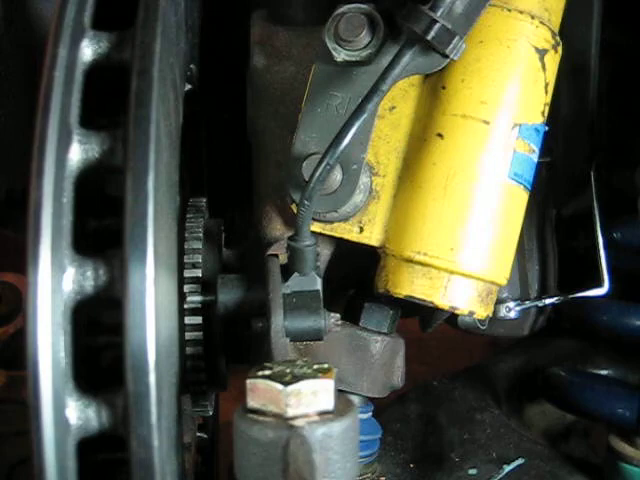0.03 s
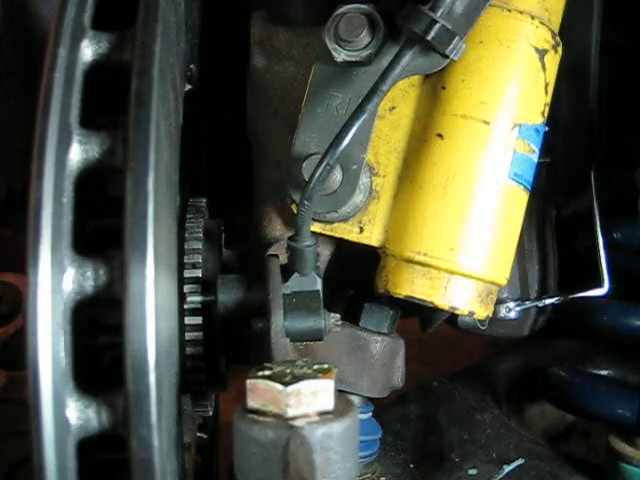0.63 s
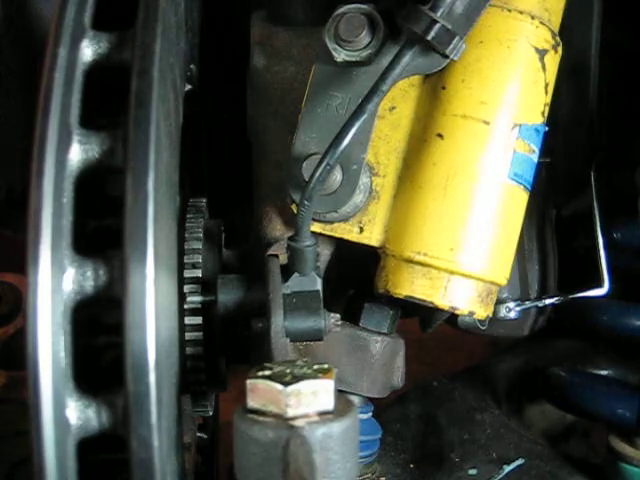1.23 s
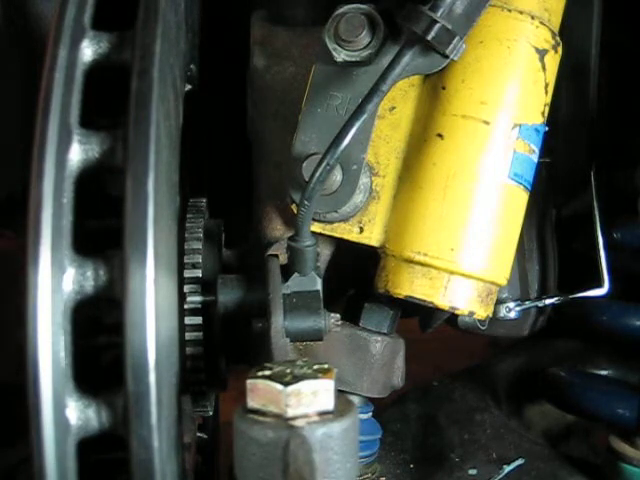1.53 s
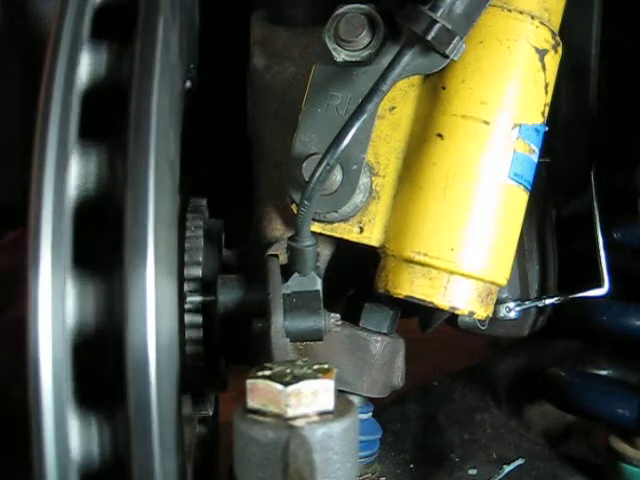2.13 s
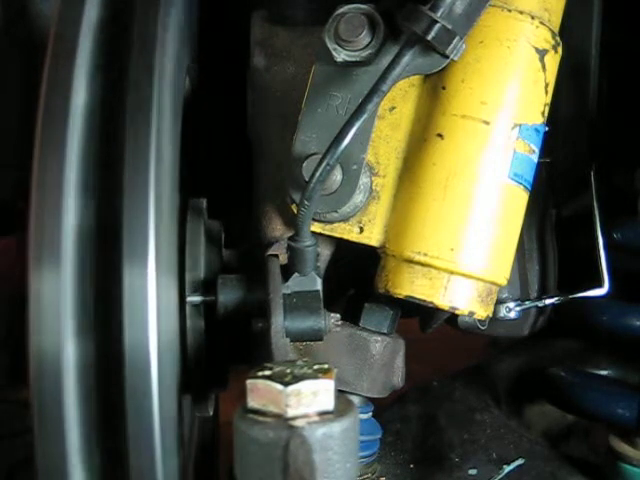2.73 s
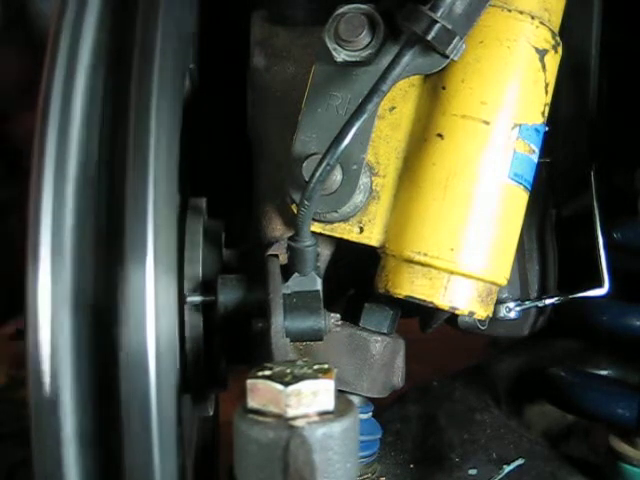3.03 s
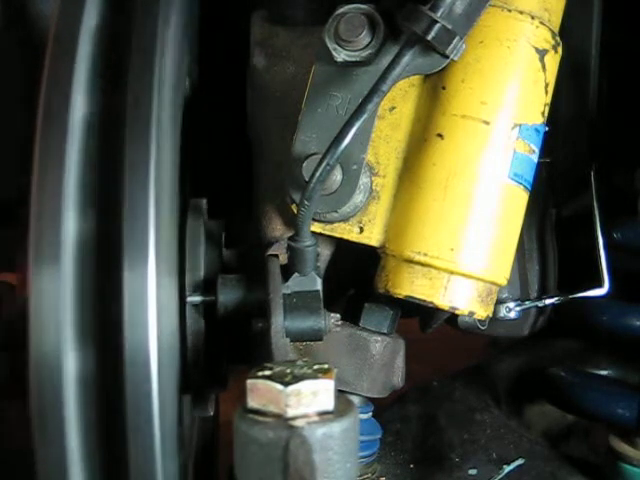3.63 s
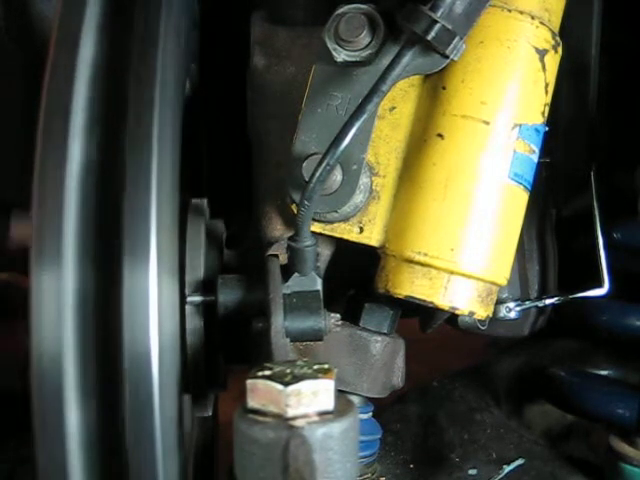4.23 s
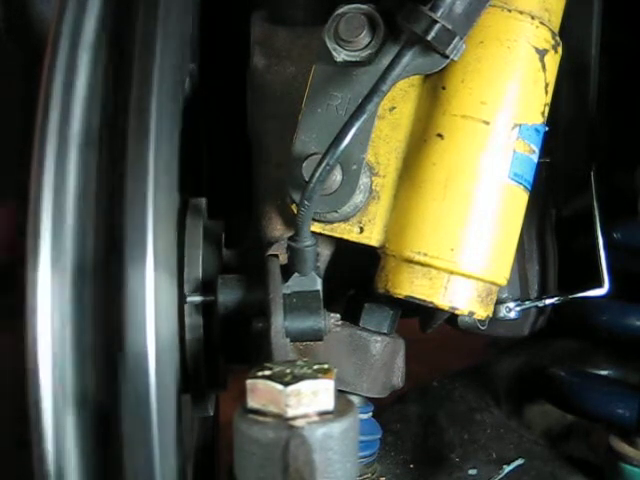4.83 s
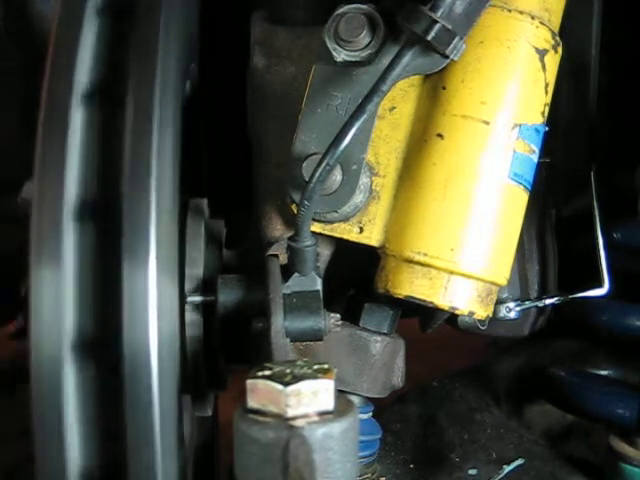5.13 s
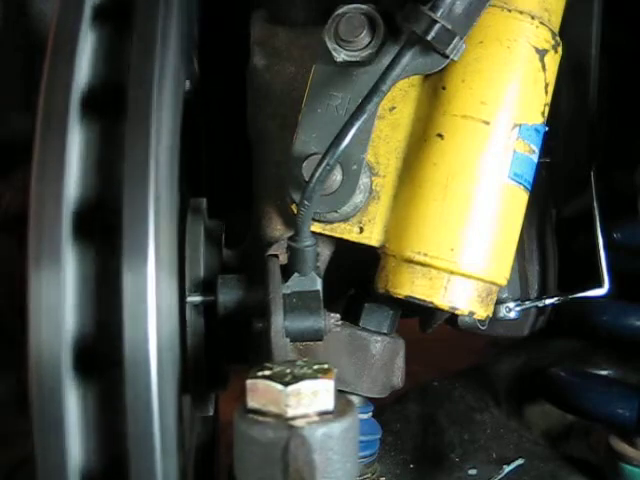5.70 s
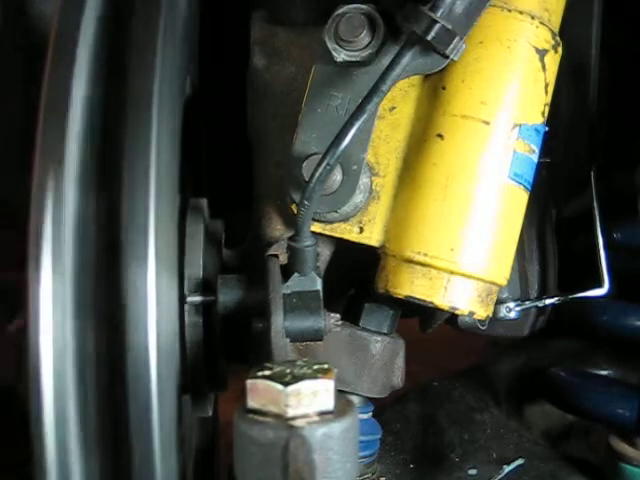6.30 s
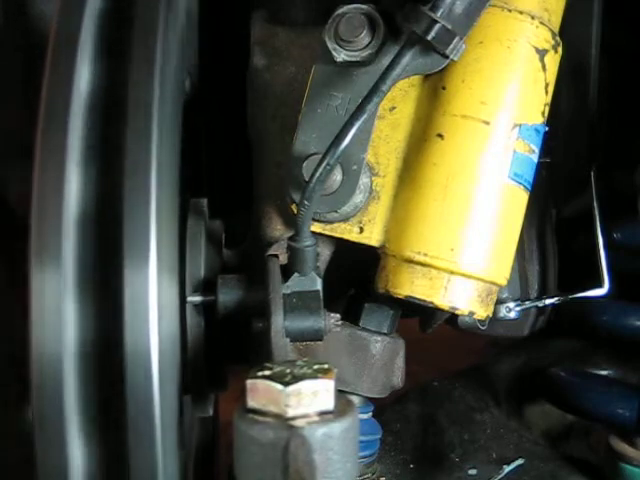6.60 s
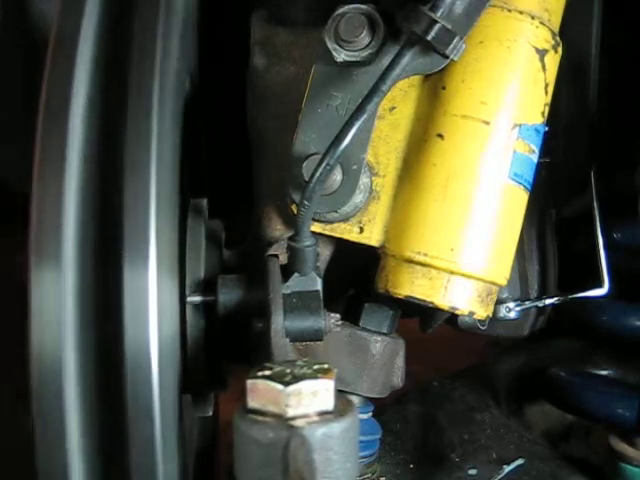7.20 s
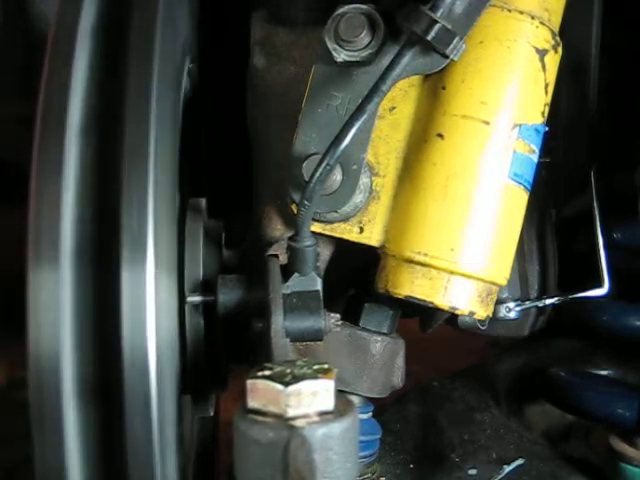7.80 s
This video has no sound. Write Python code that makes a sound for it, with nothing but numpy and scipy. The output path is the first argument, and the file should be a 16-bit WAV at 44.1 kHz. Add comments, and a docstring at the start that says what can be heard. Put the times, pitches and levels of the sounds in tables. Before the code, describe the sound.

After close scrapes and knocks, a spinning brake disc rubs with a metallic ring while its worn bearing growls and whirrs.

```python
"""A car's brake disc, spun by hand, rubs and rings: first in brief touches, at last steadily.
Its worn wheel bearing growls, whirrs and sings in patches as the balls roll over rough steel.
Before the spin, a hand scrapes over the metal and the loose hub clunks; a few more knocks follow.
It all happens close by in a garage, with a short echo, a soft hiss and a camera's thin whine."""
import sys
import numpy as np
from scipy import signal
from scipy.fft import rfft, irfft
from scipy.io import wavfile
from scipy.ndimage import uniform_filter1d

SR = 44100
rng = np.random.default_rng(int(sys.argv[2]) if len(sys.argv) > 2 else 0)


def digitize_waveform(pressure):
    """Quantize a signal to 16-bit integers and store it at the path in sys.argv[1].

    Rows of a 2-D input are taken as channels; values are limited to [-1, 1].
    """
    field = np.atleast_2d(pressure).T
    bounded = np.clip(field, -1, 1)
    quanta = np.round(bounded * 32767).astype(np.int16)
    wavfile.write(sys.argv[1], SR, quanta)


N = 350595
TIME = np.arange(N) / SR


def disc_rub():
    """The turning disc drags: tiny slips make the metal ring over a dry hiss."""
    # Brief touches. Each row: peak, rise and fall in seconds, ring in dB, hiss in dB, favoured pitch in Hz.
    rubs = [ (2.475, .014, 0.013, -34, -47, 3340), (2.513, 0.023, 0.039, -29.5, -39, 3620),
            (2.622, 0.011, .02, -35, -39.5, 3700), (2.665, 0.025, 0.043, -36, -49.5, 3580),
            (2.814, 0.02, .015, -45, -43.5, 3500), (2.91, 0.068, 0.019, -39, -58, 3460),
            (3.31, 0.096, 0.069, -36.5, -45, 3370), (3.74, 0.058, 0.015, -32, -70, 3470),
            (4.028, 0.042, 0.024, -47, -45.5, 3450), (4.16, 0.021, 0.015, -50, -50, 3420),
            (4.29, 0.07, 0.054, -36.5, -46.5, 3370), (4.366, 0.046, 0.03, -25.5, -41.5, 3440),
            (4.378, 0.0083, 0.0097, -18, -34, 3460), (4.46, 0.076, 0.059, -45, -47.5, 3430),
            (4.755, 0.15, 0.053, -49, -53, 3370), (4.87, 0.042, .03, -39, -52.5, 3470),
            (4.968, 0.015, 0.027, -44.5, -48, 3430), (5.05, 0.058, 0.12, -51, -55.5, 3360),
            (5.52, 0.032, .025, -50, -64, 3500), (5.665, 0.045, 0.013, -43.5, -55, 3500),
            (5.935, 0.055, 0.044, -39.5, -51.5, 3440), (6.07, .04, 0.038, -48, -48.5, 3480),
            (6.25, 0.047, 0.033, -36.5, -49, 3540), (6.46, 0.056, 0.072, -36, -51.5, 3560),
            (7.175, 0.056, .025, -43, -43, 3550), (7.505, 0.082, 0.034, -30.5, -51, 3420),
            (7.674, 0.036, 0.033, -30.5, -41.5, 3540), ]
    # The steady rub at the end, which dips twice. Each row: time in seconds, ring in dB.
    last_drag = [(6.5, -41), (6.63, -38.5), (6.88, -37), (7.11, -35), (7.19, -33), (7.23, -42.5),
                 (7.26, -39), (7.4, -35.5), (7.62, -44.5), (7.71, -32.5), (7.95, -36.5)]
    # The notes of the rubbed metal. Each row: pitch in Hz, width in Hz, level in dB.
    disc_notes = [(1540, 340, -3), (1834, 100, -5.5), (2416, 130, -4), (3035, 104, 4), (3214, 57, 2),
                  (3420, 270, -0.5), (3540, 170, 2), (3647, 71, 2), (4143, 64, 1), (4296, 75, -2),
                  (4670, 72, -18)]
    # The tone of the dry hiss. Each row: frequency in Hz, level in dB.
    dry_tone = [(150, -7.5), (500, -7), (1000, -7.5), (1700, 2), (2500, -0.5), (4800, 1.5), (6500, -3),
                (9000, -7), (13000, -13), (16000, -23)]
    *_, ring_db, hiss_db, ring_hz = np.transpose(rubs)
    touches, steady = swells(rubs, shape=1.6), level(last_drag)
    ring_gain = np.hypot(together(touches, ring_db), steady)
    hiss_gain = np.hypot(together(touches, hiss_db), amp(-12) * steady)
    touch_hz, steady_hz = leading(touches, ring_db, ring_hz), 3430
    contact_hz = touch_hz + (steady_hz - touch_hz) * (steady / ring_gain) ** 2
    slips = friction(per_s=9000, spread_db=2.0, judder_db=2.4, judder_per_s=170)
    grit = friction(per_s=12000, spread_db=3.0, judder_db=0.25, judder_per_s=35)
    # The contact moves as the disc turns, so each note's strength drifts, here at random.
    notes = unit(sum(amp(db + waver(per_s=12)) * ring(slips, [(hz, width, db)])
                     for hz, width, db in disc_notes))
    metal = unit(notes + amp(-5) * resonate(notes, contact_hz, width_hz=230))
    return amp(-1.5) * ring_gain * metal + amp(7.0) * hiss_gain * colour(grit, dry_tone)


def bearing():
    """Balls bump through pits in their track (growl, whirr); finer roughness makes the steel sing."""
    # Rough patches. Each row: peak, rise and fall in seconds, growl in dB, whirr in dB,
    # a factor on the whirr's pitch.
    rough_patches = [ (1.88, 0.17, 0.13, -43.5, -46, 0.93), (2.8, 0.11, 0.13, -52, -50.5, 0.96),
                     (3.53, 0.17, .14, -50, -44, 1.02), (3.8, 0.22, .2, -52, -51, 1.03),
                     (4.17, 0.071, 0.21, -50.5, -47.5, 0.89), (4.45, 0.084, 0.077, -43.5, -42, .94),
                     (4.645, 0.065, 0.052, -50, -40.5, 0.95), (5.085, 0.096, 0.12, -44.5, -39, .97),
                     (6, 0.21, 0.21, -52, -57, 0.59), ]
    # Spells of thin singing. Each row: peak, rise and fall in seconds, level in dB.
    singing_spells = [(2.82, 0.2, 0.21, -46.5), (3.6, 0.27, 0.53, -46), (6.02, 0.43, 0.36, -51.5),
                      (6.44, 0.05, 0.046, -44.5)]
    # The notes of the growl, whirr and steel tracks. Each row: pitch in Hz, width in Hz, level in dB.
    growl_notes = [(345.5, 60, 5), (402.6, 42, 0)]
    whirr_notes = [(1287, 60, -8), (1350, 190, -1)]
    track_notes = [(1880, 240, -1), (2600, 60, 8), (4400, 200, -4), (4850, 99, -1), (5090, 120, 8),
                   (5680, 140, -7), (8540, 290, -0.5), (10050, 160, -4), (12340, 260, 0), (12830, 280, 0),
                   (13600, 260, 3)]
    # The sizzle between the tracks' notes. Each row: frequency in Hz, level in dB.
    sizzle_tone = [(3000, -3.5), (6000, -2), (9000, -8.5), (11200, -5), (12800, -4), (14200, -17),
                   (16000, -22)]
    *_, growl_db, whirr_db, pitch_factor = np.transpose(rough_patches)
    patches = swells(rough_patches, shape=2.9)
    bumps = friction(per_s=1800, spread_db=2.0, judder_db=0.0, judder_per_s=89)
    growl = together(patches, growl_db) * ring(bumps, growl_notes)
    shift = leading(patches, whirr_db, pitch_factor)
    whirr = unit(sum(amp(db) * resonate(bumps, hz * shift, width) for hz, width, db in whirr_notes))
    whirr *= together(patches, whirr_db)
    roughness = friction(per_s=8000, spread_db=2.5, judder_db=0.7, judder_per_s=82)
    sing_gain = together(swells(singing_spells, shape=4), db=np.array(singing_spells)[:, -1])
    singing = sing_gain * (ring(roughness, track_notes) + amp(5.5) * colour(roughness, sizzle_tone))
    return amp(-4.5) * growl + amp(-4) * whirr + amp(-4) * singing


def hub_clunks():
    """The loose hub knocks: each sharp blow and brief rattle clicks and sets it ringing."""
    # Each row: start in seconds, thud in dB, click in dB, rattle time in seconds, bass cutoff in Hz.
    knocks = [ (0.895, -34, -35.5, 0.033, 1200), (0.912, -24, -38, 0.0033, 280),
              (0.919, -23.5, -53, .005, 280), (0.955, -24, -35, 0.0032, 230),
              (0.995, -31, -38, 0.0045, 250), (1.072, -35, -47, 0.003, 252), (1.22, -18, -43, .005, 650),
              (1.2875, -17, -37, 0.019, 220), (1.3, -22, -40, 0.011, 280), (1.543, -27, -48, 0.016, 78.5),
              (1.563, -28, -29.5, 0.024, 90), (1.594, -22.5, -29, 0.011, 89),
              (1.6087, -16, -17, 0.00083, 70), (1.62, -22, -11.5, 0.002, 100),
              (1.641, -29, -48, 0.0061, 60), (1.649, -21, -33, 0.0013, 60), (1.669, -25, -22.5, 0.0038, 80),
              (1.804, -30, -35.5, 0.01, 1000), (1.952, -27.5, -37, .013, 149),
              (2.083, -21, -29.5, 0.002, 192), (2.113, -24, -60, 0.0025, 170),
              (2.616, -46, -50, 0.0031, 100), (3.421, -17, -40.5, 0.0066, 1500),
              (4.375, -44, -35, 0.0044, 400), ]
    # The notes of the hub and strut. Each row: pitch in Hz, level in dB, seconds to fade by 60 dB.
    hub_notes = [(97, -10, 0.081), (124, -0.5, 0.12), (210, 3.5, 0.071), (250, -1, 0.18), (315, 9, .035),
                 (380, 3.5, 0.068), (423, -2.5, 0.056), (615, 5.5, 0.017), (710, -7, 0.02), (807, -7, 0.05),
                 (897, -12, 0.16), (1036, -18, 0.088), (1200, -6, 0.058), (1345, -6, .07),
                 (1440, -14, .063)]
    # The tone of a click. Each row: frequency in Hz, level in dB.
    click_tone = [(300, -49), (700, 1), (1400, 11.5), (2200, 2), (4200, 1), (6500, -30), (10000, -19),
                  (16000, -27)]
    t = np.arange(SR // 8) / SR
    blow = t == 0
    thuds, clicks = np.zeros((2, N))
    for start_s, thud_db, click_db, rattle_s, low_hz in knocks:
        noise = rng.standard_normal(len(t))
        rattle = unit(noise * abs(noise)) * np.exp(-t / rattle_s)  # a few rebounds stand out
        # Each knock has its own bass cutoff: some boom, others sound thin.
        bass_cut = signal.butter(2, low_hz, "highpass", fs=SR, output="sos")
        at = round(start_s * SR)
        clicks[at:at + len(t)] += amp(click_db) * (6 * blow + rattle)
        thuds[at:at + len(t)] += amp(thud_db) * signal.sosfilt(bass_cut, 18 * blow + 1.13 * rattle)
    t = np.arange(SR // 3) / SR
    hub = sum(amp(db - 60 * t / fade_s) * np.sin(2 * np.pi * hz * t) for hz, db, fade_s in hub_notes)
    # The hub's ringing has no deep bass below about 70 Hz.
    hub = signal.sosfilt(signal.butter(4, 70, "highpass", fs=SR, output="sos"), hub)
    return amp(-5.5) * pass_through(thuds, hub) + amp(1.5) * colour(clicks, click_tone)


def hand_scrapes():
    """A hand drags over the metal: fast strokes fizz, heavy ones rasp."""
    # Each row: peak, rise and fall in seconds, swell shape, level in dB,
    # fizz and rasp in dB against that level, pitch of the swish in Hz.
    hand_strokes = [ (0.33, .08, 0.25, 2, -51, -10, -14, 2900), (0.42, .03, .04, 2, -59, 5, -12, 4000),
                    (0.82, .09, 0.079, 2, -51, -2.5, -3, 2000),
                    (0.9, 0.032, 0.17, 1.6, -44, -7.5, 1.5, 1700),
                    (1.185, 0.063, 0.033, 1.2, -38, -7, -5, 2700),
                    (1.224, 0.017, 0.018, 0.91, -21, -1, -3.5, 3940),
                    (1.302, 0.0098, 0.012, 2, -25, 3.5, -7, 4860),
                    (1.35, 0.087, .1, 1.9, -31.5, -4.5, -4.5, 2500),
                    (1.464, 0.038, 0.036, 2.1, -20.5, -20, -22, 2450),
                    (1.491, 0.036, 0.045, 1.4, -22.5, 0.5, -18, 4530),
                    (1.585, 0.046, 0.032, 1.9, -29, 0.5, 2, 3620),
                    (1.63, 0.052, 0.025, 0.86, -23, -20, -1.5, 3430),
                    (1.845, .11, 0.13, 0.86, -40.5, -11, -6, 3240),
                    (1.975, 0.011, 0.013, 2.3, -34.5, 1, -10, 4000),
                    (1.995, .012, 0.041, 0.91, -44.5, 3, -7, 4100),
                    (2.101, 0.016, 0.017, 4.4, -28, -1.5, -22, 4520),
                    (2.122, .012, 0.045, 1.1, -40, 0.5, -8, 4580), ]
    # The tones of the scrape's body, high fizz and low rasp. Each row: frequency in Hz, level in dB.
    body_tone = [(900, -30), (1700, -19), (2600, -5.5), (3800, 4.5), (5000, 5), (7000, -3), (9000, -36),
                 (13000, -34)]
    fizz_tone = [(4500, -15.5), (7500, 0), (9500, -4.5), (12500, -6.5), (14500, -14), (16000, -22)]
    rasp_tone = [(200, -16), (480, -5.5), (680, 2.5), (1000, -4.5), (1180, -1), (1380, -1.5), (1700, -9.5),
                 (2400, -7), (5000, -30)]
    *_, shape, db, fizz_db, rasp_db, swish_hz = np.transpose(hand_strokes)
    strokes = swells(hand_strokes, shape)
    slips = friction(per_s=14000, spread_db=0.0, judder_db=1.3, judder_per_s=65)
    fine_slips = friction(per_s=12000, spread_db=0.5, judder_db=1.0, judder_per_s=150)
    catches = friction(per_s=2800, spread_db=5.0, judder_db=2.0, judder_per_s=44)
    drag = friction(per_s=9000, spread_db=0.0, judder_db=4.0, judder_per_s=130)
    swish = resonate(drag, leading(strokes, db, swish_hz), width_hz=2300)
    body = together(strokes, db) * (amp(-3.5) * colour(slips, body_tone) + amp(-2.0) * swish)
    fizz = together(strokes, db + fizz_db) * colour(fine_slips, fizz_tone)
    rasp = together(strokes, db + rasp_db) * colour(catches, rasp_tone)
    return body + amp(-1.0) * fizz + amp(-2.5) * rasp


def garage_echo(x):
    """Sound bounces off the wheel arch and walls; the treble dies first."""
    # Each row: frequency in Hz, seconds to fade by 60 dB.
    fade_times = [(100, 0.28), (1000, 0.3), (4000, 0.26), (14000, 0.08)]
    bounces = rng.standard_normal(SR // 2) * (rng.random(SR // 2) < 3000 / SR)  # about 3000 a second
    hz, t, bands = signal.stft(bounces, SR, nperseg=256)
    fade = amp(-60 * t / look_up(fade_times, hz)[:, None])
    _, tail = signal.istft(bands * fade, SR, nperseg=256)
    return pass_through(x, tail)


def background():
    """An even hiss, the camera's thin whine and a faint early tone."""
    # The tone of the hiss. Each row: frequency in Hz, level in dB.
    hiss_tone = [(25, -25), (60, -8.5), (120, -6), (340, -6.5), (500, -9), (850, -5), (1050, -8.5),
                 (1800, -6.5), (3700, -10), (8500, -18), (10800, -19), (12700, -22), (14500, -16),
                 (15800, -28)]
    # The camera's steady tones. Each row: pitch in Hz, tremble in Hz, level in dB.
    camera_tones = [(7558, 14, -66), (15148, 5, -72)]
    # How the early tone fades. Each row: time in seconds, level in dB.
    early_fade = [(0, -57.5), (0.8, -57.5), (1.2, -63), (2.2, -72)]
    hiss = amp(-47) * unit(colour(rng.standard_normal(N), hiss_tone))
    whine = sum(amp(db) * whistle(hz, tremble_hz) for hz, tremble_hz, db in camera_tones)
    return hiss + whine + level(early_fade) * whistle(hz=1306, tremble_hz=13.5)


def friction(per_s, spread_db, judder_db, judder_per_s):
    """Tiny random slips; spread makes their sizes uneven, judder makes them swell in clumps."""
    size = amp(spread_db * np.minimum(rng.exponential(1, N), 4))
    slips = (rng.random(N) < per_s / SR) * rng.choice([-1, 1], N) * size
    return unit(slips * amp(judder_db * waver(judder_per_s)))


def ring(x, notes):
    """Lets x ring a set of fixed notes; narrow ones ring longer."""
    out = np.zeros(N)
    for hz, width_hz, db in notes:
        decay = np.exp(-np.pi * width_hz * np.sqrt(2) / SR)
        stage = [1, 0, -1, 1, -2 * decay * np.cos(2 * np.pi * hz / SR), decay * decay]
        out += amp(db) * unit(signal.sosfilt([stage, stage], x))
    return unit(out)


def resonate(x, hz, width_hz):
    """Keeps one band of x around a pitch that may glide."""
    turn = np.exp(2j * np.pi * np.cumsum(hz * np.ones(N)) / SR)
    decay = np.exp(-np.pi * width_hz * np.sqrt(2) / SR)
    # Slide the band down to 0 Hz, smooth it, then slide it back up.
    smoothed = signal.lfilter([(1 - decay) ** 2], [1, -2 * decay, decay * decay], x / turn)
    return unit((turn * smoothed).real)


def colour(x, tone):
    """Shapes the bass and treble of x by a table of Hz and dB."""
    log_gain = np.log(amp(look_up(tone, abs(np.fft.fftfreq(4096, 1 / SR)))))
    spectrum = np.exp(np.conj(signal.hilbert(log_gain)))  # nothing sounds ahead of a click
    return pass_through(x, np.fft.ifft(spectrum).real[:2048])


def pass_through(x, response):
    """Each sample of x sets off a copy of the response, scaled to an energy of 1."""
    return signal.oaconvolve(x, response / np.linalg.norm(response))[:N]


def whistle(hz, tremble_hz):
    """A tone of even strength whose pitch trembles."""
    pitch_hz = hz + tremble_hz * waver(per_s=67.0)
    return unit(np.sin(2 * np.pi * np.cumsum(pitch_hz) / SR))


def waver(per_s):
    """A smooth random curve with up to about per_s wobbles a second."""
    slowing = 1 + (np.fft.rfftfreq(N, 1 / SR) / per_s) ** 4
    return unit(irfft(rfft(rng.standard_normal(N)) / slowing, N))


def swells(rows, shape):
    """One rise and fall for each row. Shape 1 is pointed, 2 a bell, more a flat top."""
    t = TIME[::32]
    from_peak = np.array([np.maximum((peak - t) / rise, (t - peak) / fall)
                          for peak, rise, fall, *_ in rows])
    return np.exp(-abs(from_peak) ** np.reshape(shape, (-1, 1)))


def together(gains, db):
    """Joins swells with these peak levels into one gain curve."""
    return np.interp(TIME, TIME[::32], np.sqrt(amp(db) ** 2 @ gains ** 2))


def leading(gains, db, values):
    """Blends one value per swell over time; the loudest swells count most."""
    power = (amp(db)[:, None] * gains) ** 2 + 1e-20
    return np.interp(TIME, TIME[::32], values @ power / power.sum(axis=0))


def level(points):
    """A smooth gain curve through points of seconds and dB, silent outside them."""
    db = np.interp(TIME, *np.transpose(points), left=-120, right=-120)
    return uniform_filter1d(amp(db), size=128)


def look_up(points, hz):
    """Reads between a table's rows, with octaves evenly spaced."""
    row_hz, values = np.transpose(points)
    return np.interp(np.log(hz + 1), np.log(row_hz + 1), values)


def amp(db):
    """Turns decibels into a gain."""
    return 10 ** (np.asarray(db) / 20)


def unit(x):
    """Scales x to an average strength (rms) of 1."""
    return x / np.sqrt(np.mean(x ** 2) + 1e-20)


def scene():
    """Mixes all sources and their echo, the same in both channels."""
    knocks = hub_clunks()
    sliding = hand_scrapes() + disc_rub() + bearing()
    echo = garage_echo(amp(-8.0) * knocks + amp(-10.5) * sliding)
    mono = knocks + sliding + echo + background()
    return np.array([mono, mono])


def record(dry):
    """Silences the first moment and cuts off the highest treble."""
    start_s, top_hz = 0.072, 15800
    treble_cut = signal.firwin(801, top_hz, window=("kaiser", 9), fs=SR)
    return signal.oaconvolve(dry * (TIME >= start_s), treble_cut[None], "same", axes=1)


dry = scene()
out = record(dry)
digitize_waveform(out)
```